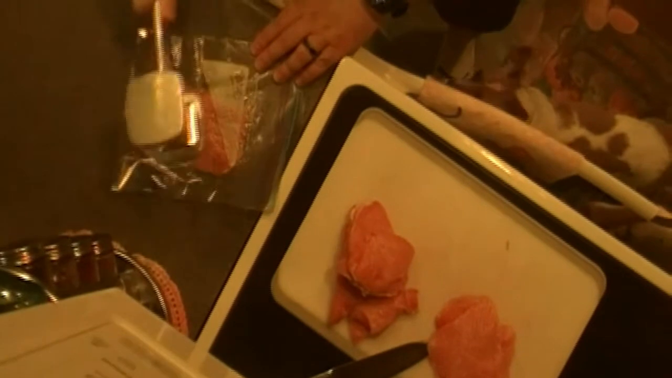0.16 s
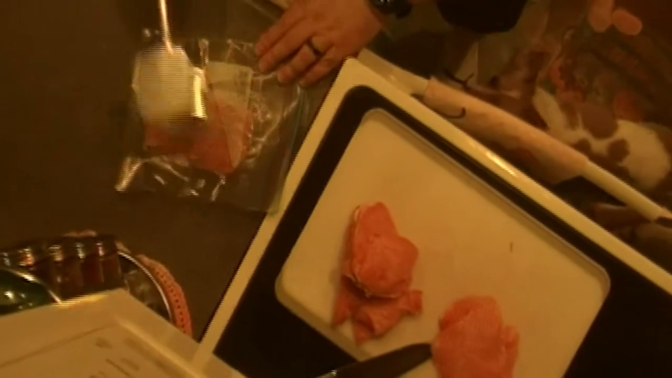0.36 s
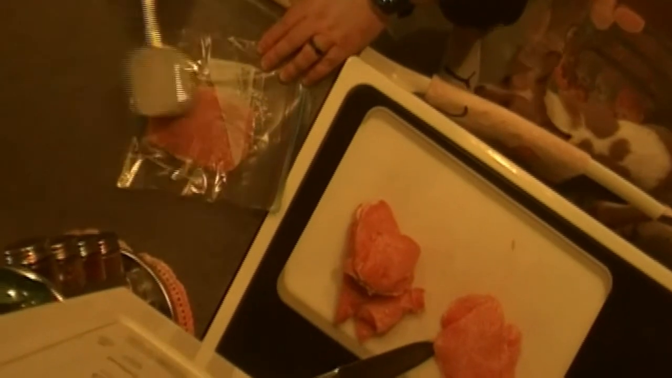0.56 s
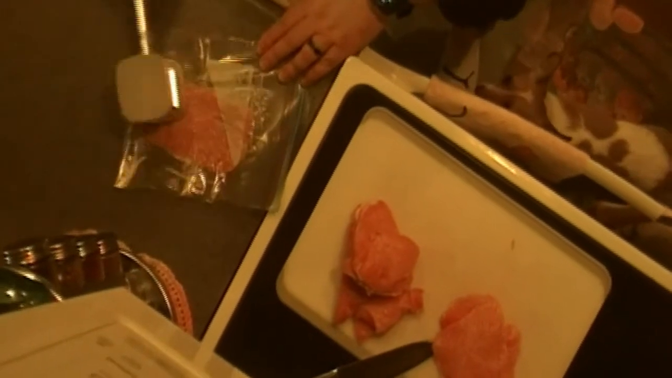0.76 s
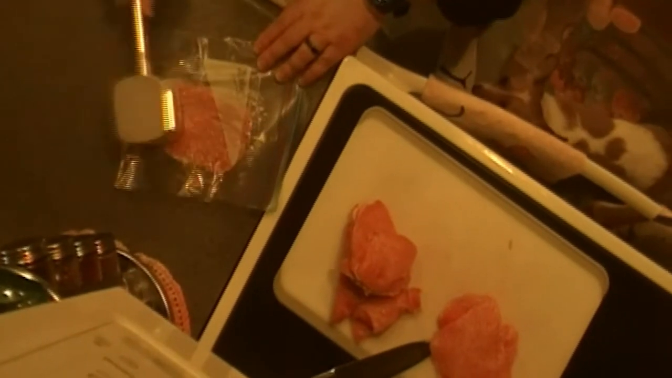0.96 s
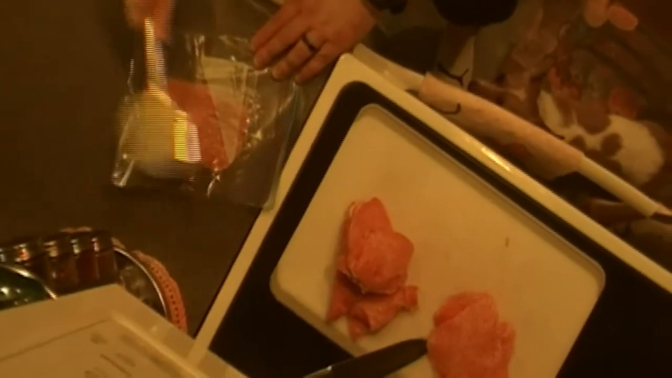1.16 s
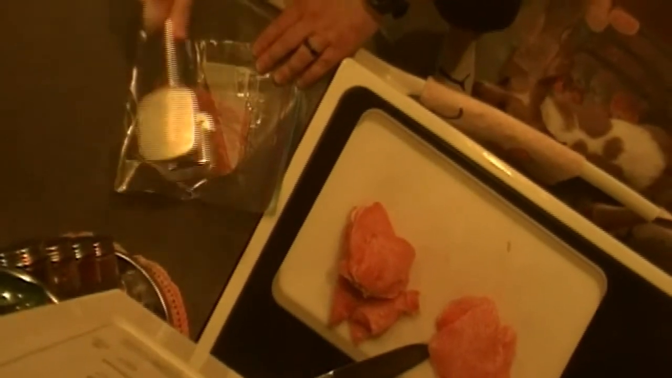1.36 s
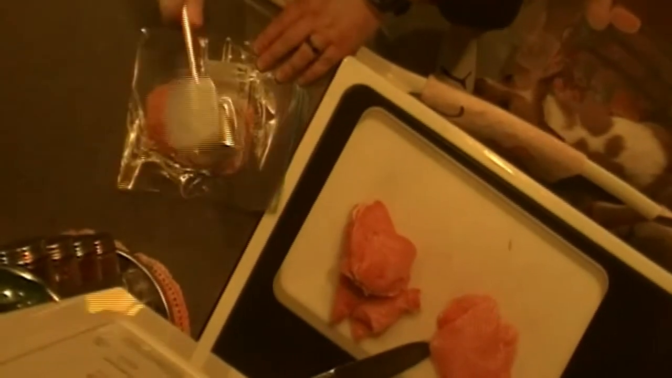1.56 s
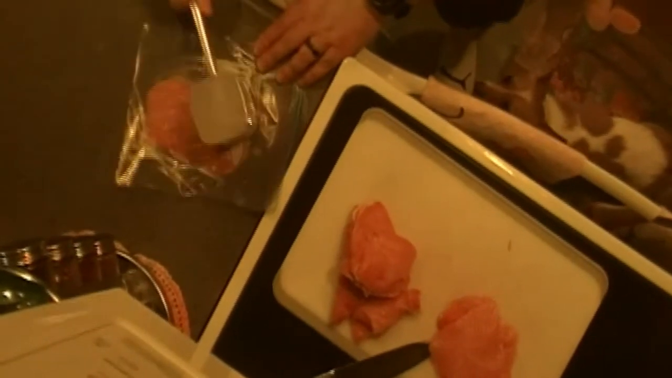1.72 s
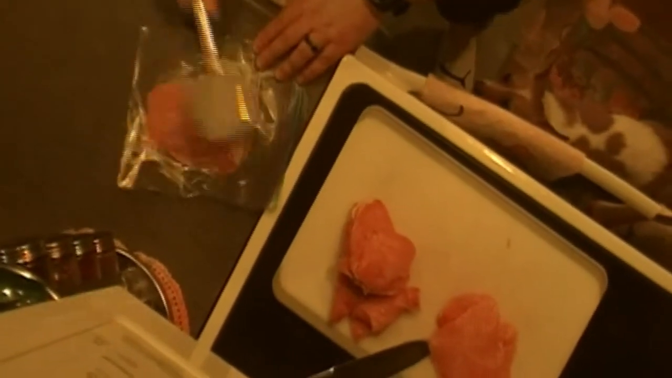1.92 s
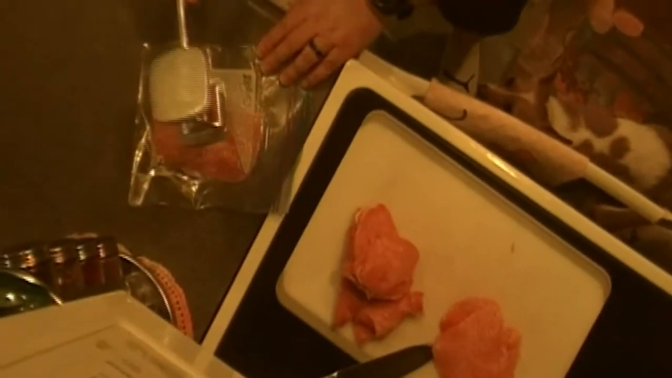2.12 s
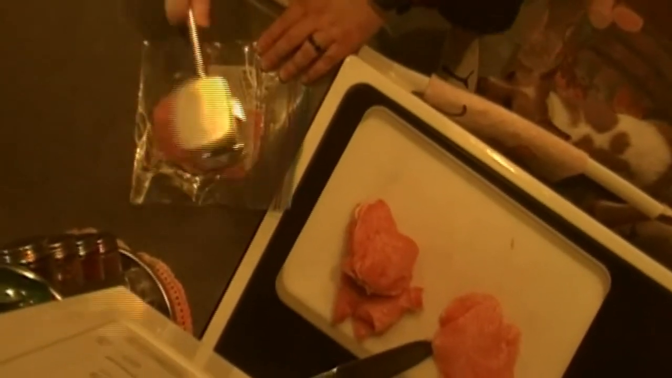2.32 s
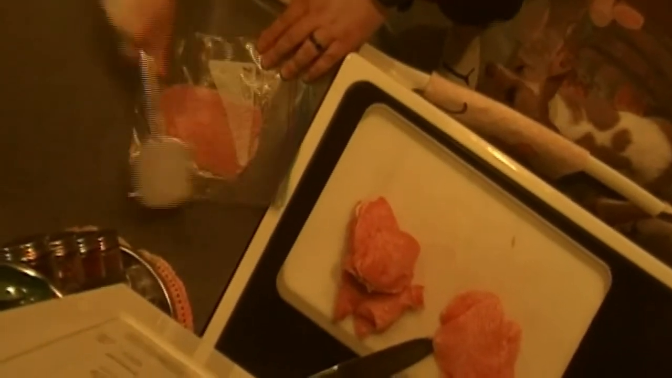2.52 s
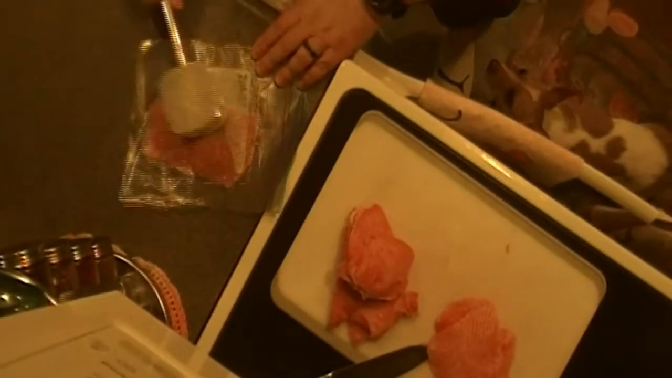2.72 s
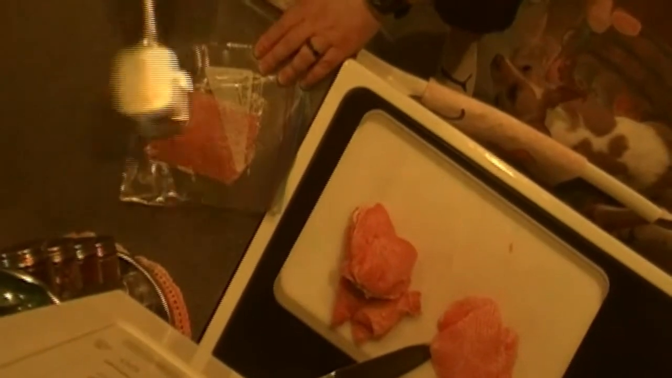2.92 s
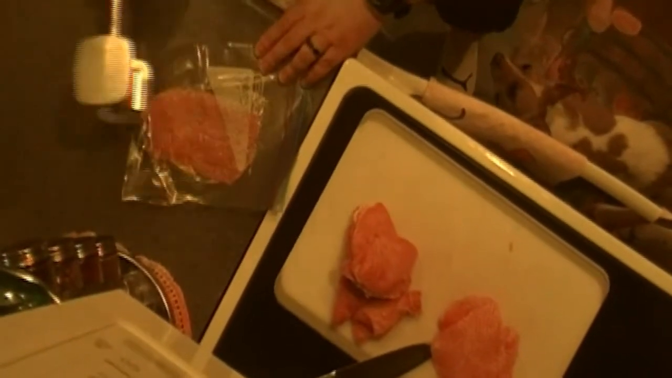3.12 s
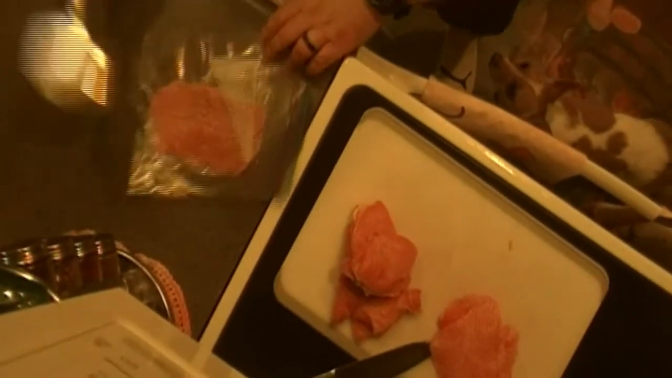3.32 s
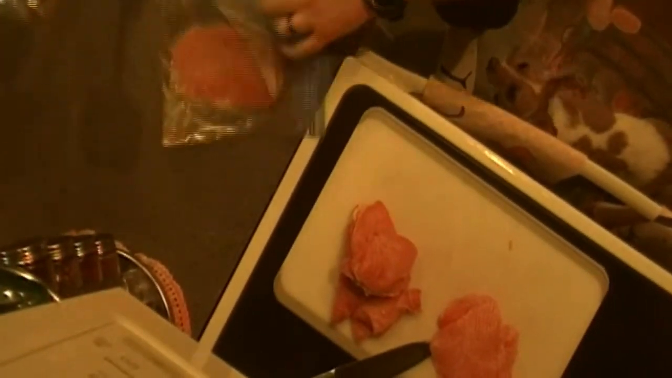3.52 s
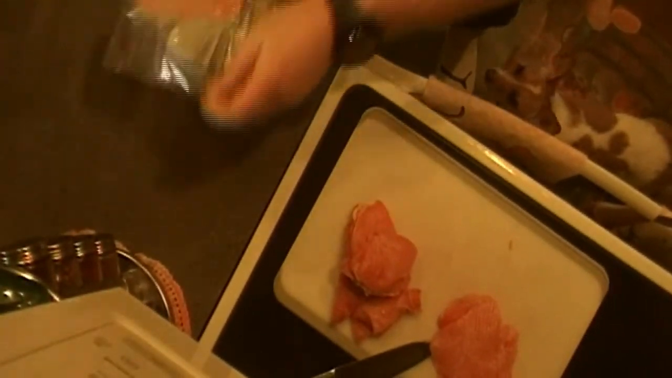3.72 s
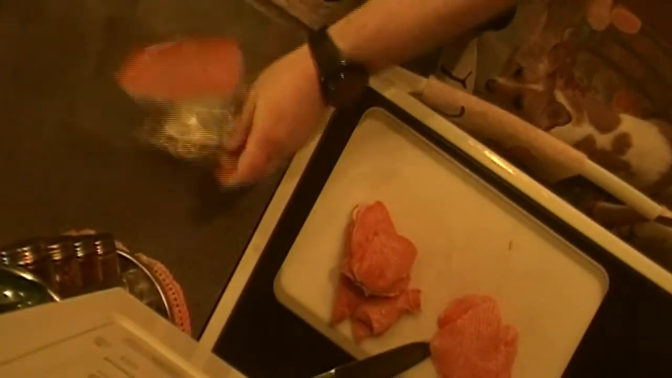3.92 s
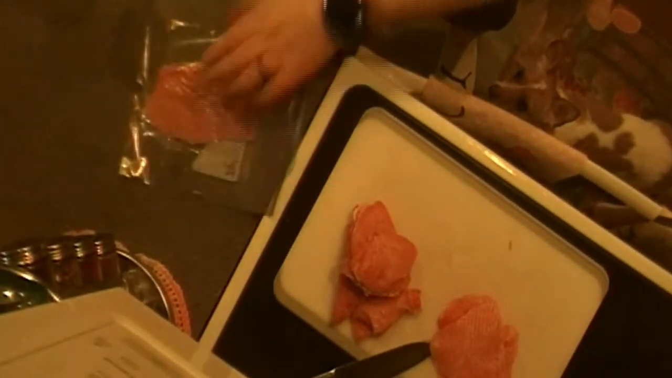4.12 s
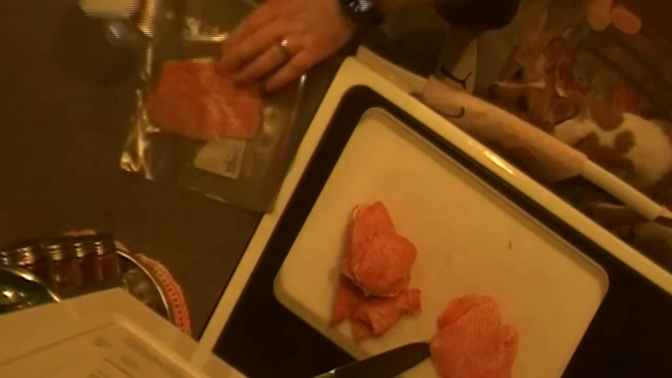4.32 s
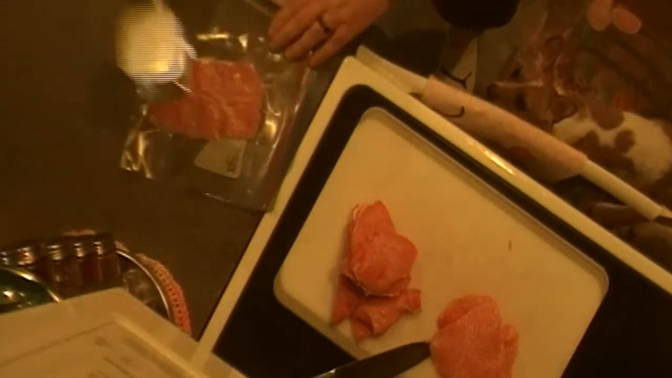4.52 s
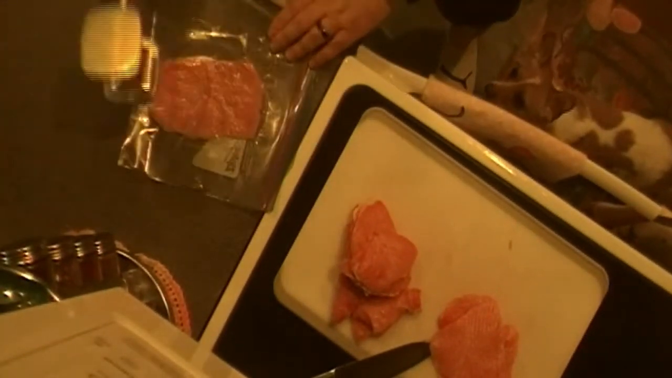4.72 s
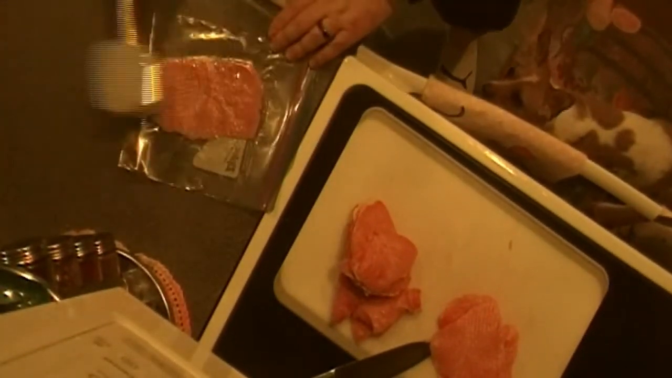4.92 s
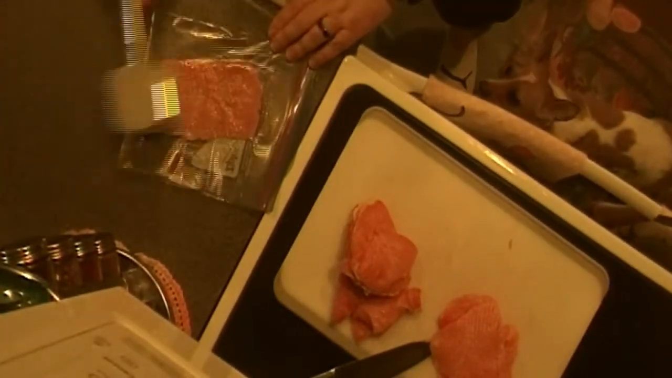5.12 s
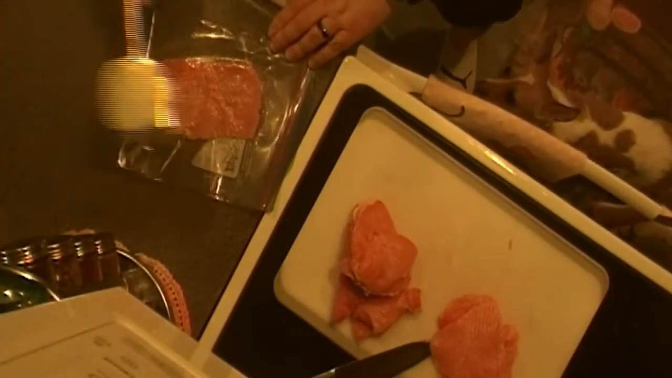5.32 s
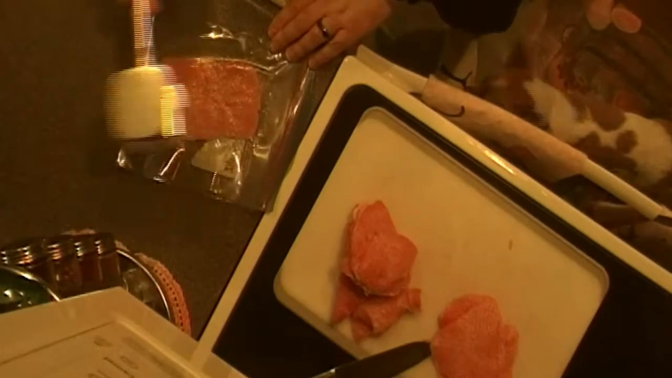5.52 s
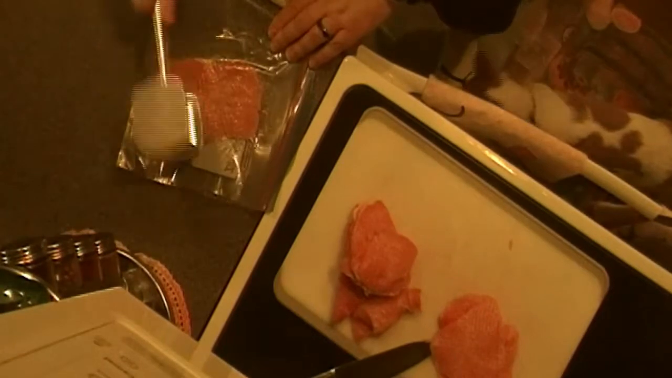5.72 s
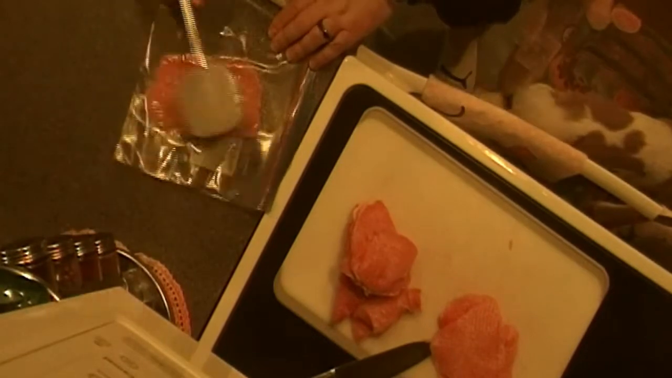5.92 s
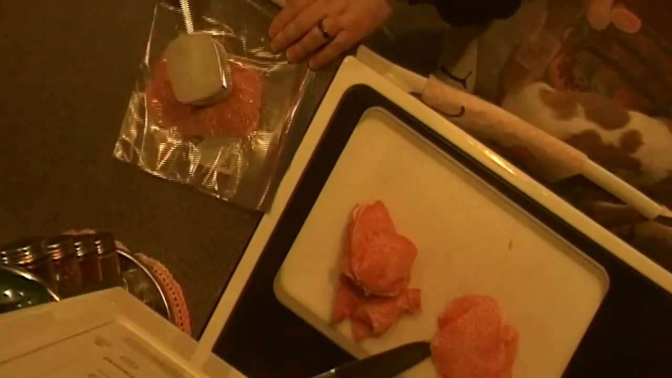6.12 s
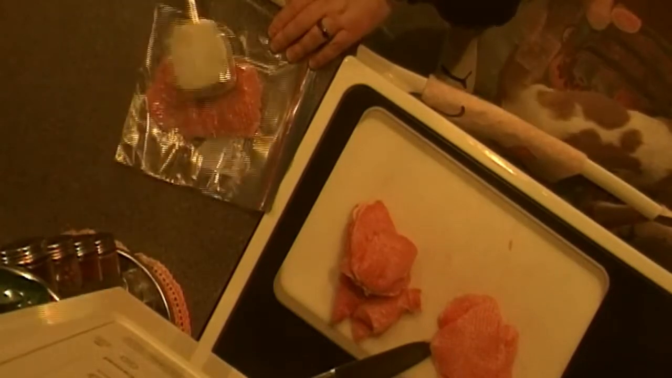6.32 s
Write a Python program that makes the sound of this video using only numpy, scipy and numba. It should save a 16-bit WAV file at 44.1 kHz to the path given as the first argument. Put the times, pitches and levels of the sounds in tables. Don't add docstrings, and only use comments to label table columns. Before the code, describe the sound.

A metal mallet pounds meat in a thin plastic bag on a kitchen counter. From about 0.1 to 3.3 seconds, fourteen heavy blows fall roughly every quarter second, varying between dull meaty thuds and brighter, harder cracks. Each begins with a short slap on the film, then a low thump that rings the counter and cabinets, while glass and steel nearby hop and jingle. From 3.5 to 4.6 the pounding stops: the bag crackles and snaps as it is gathered and turned, loudest near 4.1, knocks the counter at 4.3, then is smoothed and patted. Blows resume at 4.7 and continue about every quarter second to 6.2, with a strong rattle near 5.0. The room gives short echoes over faint low noise. The close camera microphone squashes the peaks, ducks at each hit and swells back, with dulled extreme treble.

```python
import sys
import numpy as np
from scipy import signal
from scipy.fft import rfft, irfft
from scipy.io import wavfile
from numba import njit

SR = 44100
rng = np.random.default_rng(int(sys.argv[2]) if len(sys.argv) > 2 else 0)


def to_linear_factor(level_db):
    exponent = np.asarray(level_db, float) / 20
    return 10 ** exponent


def output_pcm(signal):
    pcm = np.clip(np.atleast_2d(signal).T, -1, 1) * 32767
    wavfile.write(sys.argv[1], SR, np.round(pcm).astype(np.int16))


N = 280476
LEAD = SR // 4
BANDS_HZ = 24 * 2 ** np.arange(0, 9.1, 1 / 3)
HOP_S = 0.027

# start in seconds, slap level in dB, length in ms, centre in Hz,
# depth in dB (a spot far from a support thumps lower).
SLAPS = [(0.114, 2, 4, 3080, 0), (0.3498, 6, 3.3, 3760, 1.5), (0.6095, 4, 3.3, 3060, -1),
         (0.8411, -3, 4.6, 2780, -2), (1.0846, 0.5, 5, 3200, -2.5), (1.3128, -7, 7.4, 2640, -4),
         (1.5561, 5.5, 3.5, 3900, 5), (1.7858, -5, 5.5, 3400, 6), (2.0495, 5, 2.3, 2620, 1.5),
         (2.3185, 5, 4, 2800, 0.5), (2.583, 3, 3.8, 2230, 1), (2.8456, -6, 3.8, 3200, 0.5),
         (3.1, 1.5, 4.5, 2040, -1.5), (3.3333, -6, 1.2, 1370, -1.5), (4.71, 1.5, 2.94, 3180, -3),
         (4.961, 7.5, 3.2, 1950, -3), (5.231, -2, 4.04, 1850, -1), (5.5002, -5, 3.5, 2700, -2.5),
         (5.7388, -2.5, 4, 1830, 2), (5.9769, 2.5, 3.7, 3520, 3), (6.2111, 2.5, 2.66, 2070, 0)]
# pitch in Hz, level in dB per Hz.
FILM_COLOUR = [(88, -30), (150, -4), (333, -9), (535, -13), (1650, -6.5), (1840, -6.5), (4990, -10),
               (10300, -19.5), (11500, -24), (15000, -55), (22000, -120)]
# start in seconds, hold in seconds, rustle in dB,
# dull flop of the load in dB, knock on the counter in dB.
HAND_MOVES = [
    (3.492, 0.25, -34.5, -45, -34),
    (3.777, 0.049, -32.5, -37, -48),
    (3.872, .004, -29, -32, -43),
    (3.925, 0.12, -47, -44, -53),
    (4.045, 0.019, -22.5, -24, -39),
    (4.089, 0.047, -18, -29.5, -41),
    (4.292, 0.032, -21, -38, -28.5),
    (4.382, .07, -35.5, -48, -44),
    (4.604, 0.016, -25.5, -44, -29.5),
]


def along(table, hz):
    f, value = np.transpose(table)
    return np.interp(np.log(np.maximum(hz, 1)), np.log(np.maximum(f, 1)), value)


def spikes(s, size):
    out = np.zeros(N + LEAD, np.result_type(size, float))
    np.add.at(out, (np.asarray(s) * SR).astype(int) + LEAD, size)
    return out


def fade(x, t60, hz=0):
    turn = 2j * np.pi * hz - np.log(1000) / max(t60, 1e-3)
    return signal.lfilter([1], [1, -np.exp(turn / SR)], x)


def band(x, hz, width=1 / 3):
    edges = np.clip(hz * 2 ** (np.array([-0.5, 0.5]) * width), 5, SR / 2.2)
    return signal.sosfilt(signal.butter(2, edges, "band", fs=SR, output="sos"), x)


def unit(x):
    return x / np.max(np.abs(x))


def burst(out_s, size_db, rise_s, ring_s, hz, width, tick=0):
    t = np.arange(int(0.06 * SR)) / SR
    rise = np.minimum(t / rise_s, 1) ** 2
    shape = rise * np.exp(-np.log(1000) * np.maximum(t - rise_s, 0) / ring_s)
    noise = rng.standard_normal((3, len(t)))
    noise[0, int(rise_s * SR)] += tick
    crack = unit(band(shape * (noise[0] + 0.15 * noise[1:]), hz, width))
    return int(out_s * SR) + LEAD, to_linear_factor(size_db) * crack


def add(out, start, piece):
    space = out[:, start:start + piece.shape[1]]
    space += piece[:, :space.shape[1]]


def slaps():
    # centre in Hz, width in octaves.
    slap_width = [(1500, 2.62), (4000, 1.01)]
    out = np.zeros((2, N + LEAD))
    for when, db, ms, hz, _ in SLAPS:
        ms = np.clip(ms, 0.5, 9)
        width = max(along(slap_width, hz), 0.5)
        add(out, *burst(when, db + 25.0, ms / 2400, ms / 400, hz, width))
    return out


def by_pitch(hz, boom_db, thump_db, clap_db, bright_db, depth_db):
    boom = along([(110, 0.65), (170, 0.026)], hz) * (boom_db + 5.5)
    thump = along([(110, 0.2), (170, 0.91), (420, 1), (600, 0)], hz) * thump_db
    depth_share = [(110, -0.26), (170, 0.75), (210, 1), (310, -1.06), (420, 0.39), (600, 0.15)]
    depth = along(depth_share, hz) * depth_db
    clap = along([(420, 0.19), (600, 0.95), (1200, 0.83), (3000, 0.18)], hz) * clap_db
    bright = along([(1000, 0.4), (1600, 0.35), (2500, 0.55), (5000, 0.031)], hz) * bright_db
    return boom + thump + depth + clap + bright


def counter(s, *strength_db):
    # pitch in Hz, level in dB, t60 in seconds.
    cabinet_modes = [(68.95, -11.5, 0.5), (86.1, -9.5, 0.5), (134, -29, 0.12), (195.1, -5.5, 0.24),
                     (258.8, -14, 0.38), (314.4, -13, 0.28), (373.5, -3.5, 0.23), (468, -12.5, 0.2),
                     (637.4, -21.5, 0.21), (675, -17.5, 0.13), (747, -21.5, 0.18), (852, -10.5, 0.054),
                     (1056, -24.5, 0.14)]
    # pitch in Hz, level in dB, t60 in seconds, lateness in ms.
    top_modes = [(140.4, 12.5, 0.031, 0.57), (339.5, 8.5, 0.052, 1.57), (562, -4.5, 0.036, 1.53),
                 (698, 1.5, 0.033, 1.22), (1047, 2.5, 0.021, 1.24)]
    modes = [(*mode, 1.3) for mode in cabinet_modes] + list(top_modes)
    out = 0
    spot = rng.standard_normal((len(s), len(modes)))
    for (hz, db, t60, late_ms), luck in zip(modes, spot.T):
        strength = to_linear_factor(db + by_pitch(hz, *strength_db) + 2.1 * luck)
        out = out - fade(spikes(s + late_ms / 1000, strength), t60, hz).imag
    push = np.hanning(int(0.0004 * SR) + 2)
    return to_linear_factor(5.0) * np.convolve(out, push / push.sum())[:N + LEAD]


def jingle(s, jingle_db):
    glass_hz = [1386, 2340, 2400, 2450, 2490, 3137, 3630, 3675, 4050, 4104, 4227, 4485, 4521, 5060]
    # level in dB, t60 in seconds.
    glass_rings = [(2, 0.23), (-16.5, 0.5), (-7.5, 0.6), (-5.5, 0.34), (-12, 0.6), (-1.5, 0.15),
                   (-5.5, 0.31), (-7, 0.61), (2, 0.13), (-1.5, 0.08), (-7, 0.17), (-6.5, 0.41),
                   (-0.5, 0.13), (3, 0.18)]
    steel_hz = [5350, 5960, 6050, 6977, 7690, 7790, 8520, 8610, 9316, 9570, 9960, 10400, 10520, 11030]
    # level in dB, t60 in seconds.
    steel_rings = [(-20, 0.2), (-10.5, 0.17), (-2, 0.4), (-5.5, 0.28), (-6, 0.38), (-8.5, 0.56), (-7, 0.24),
                   (-2.5, 0.34), (-2.5, 0.35), (-6, 0.82), (-3, 0.35), (-6, 0.2), (-4.5, 0.28), (-13, 0.35)]
    shake = fade(fade(spikes(s + HOP_S, to_linear_factor(jingle_db)), 0.25), 0.033).real / (0.0054 * SR)
    shake += 0.3 * fade(spikes(s, to_linear_factor(jingle_db)), 0.036).real
    landings = np.flatnonzero(rng.random(N + LEAD) < 1500 / SR)
    weight = shake[landings] * to_linear_factor(np.minimum(1.6 * rng.exponential(size=len(landings)), 7))
    blow = np.clip(np.searchsorted(s * SR + LEAD, landings) - 1, 0, None)
    out = 0
    for hz, (db, t60) in zip([*glass_hz, *steel_hz], [*glass_rings, *steel_rings]):
        apart = along([(1500, 0.54), (4000, 0.91), (8000, 1.27)], hz)
        luck = rng.standard_normal((3, len(landings)))
        favoured = to_linear_factor(2.5 * rng.standard_normal(len(s)))[blow]
        knocks = np.zeros((2, N + LEAD))
        knocks[:, landings] = favoured * weight * (luck[0] + apart * luck[1:]) / np.hypot(1, apart)
        ring_s = min(t60, 0.6) * along([(5000, 0.31), (9000, 0.18)], hz)
        out = out + to_linear_factor(db) * fade(knocks, ring_s, hz).imag
    return to_linear_factor(-29) * out


def gesture(db, t60):
    t = (np.arange(N + LEAD) - LEAD) / SR
    start, hold = np.transpose(HAND_MOVES)[:2, :, None]
    rise = np.clip((t - start) / 0.0087, 0, 1)
    shape = rise * to_linear_factor(-60 * np.clip(t - start - hold, 0, 1) / t60)
    return to_linear_factor(db) @ shape


def creases(per_s):
    happens = rng.random(N + LEAD) < per_s / SR
    size = happens * to_linear_factor(np.minimum(3.7 * rng.exponential(size=N + LEAD), 13))
    return size * (rng.standard_normal(N + LEAD) + 0.5 * rng.standard_normal((2, N + LEAD)))


def bag():
    # start in seconds, peak in dB, centre in Hz, width in octaves.
    film_snaps = [(3.576, -19, 2590, 1.1), (3.616, -11.5, 2020, 1.8), (3.635, -27, 2230, 1.8),
                  (3.689, -11, 4520, 1.6), (3.723, -31, 923, 1.5), (3.789, -12.5, 1400, 2.7),
                  (3.82, -14, 2600, 2.5), (3.8817, -6, 5430, 0.98), (3.8828, -13.5, 1790, 1.8),
                  (3.931, -17.5, 2000, 2.5), (3.946, -33, 1440, 2.2), (3.995, -13.5, 2060, 2.1),
                  (4.028, -10, 1010, 3), (4.051, -13, 4430, 1.7), (4.057, -10, 1270, 3),
                  (4.069, -20, 1310, 2.1), (4.0904, 0, 1890, 2.2), (4.105, -10, 4800, 0.73),
                  (4.119, -5.5, 1510, 0.59), (4.13, -6, 1890, 0.89), (4.142, -8, 2080, .6),
                  (4.298, -10, 1610, 1.3), (4.307, 0, 2310, 1.4), (4.324, -5, 4230, 1.1),
                  (4.418, -11.5, 3270, 0.65), (4.429, -13, 1740, 1.5), (4.455, -18, 1300, 1.1),
                  (4.481, -22.5, 3300, 0.93), (4.611, -5, 3270, 1.5)]
    # pitch in Hz, level in dB, t60 in seconds.
    flop_rings = [(330, -10, 0.028), (382, -5.5, 0.046), (654, 0, 0.032), (925, -5.5, 0.035)]
    rustle_db, flop_db, knock_db = np.transpose(HAND_MOVES)[2:]
    effort = gesture(rustle_db, 0.071)
    flop = gesture(flop_db, 0.078)
    knock = gesture(knock_db, 0.31)
    clicks = creases(600)
    crackle = 0
    for hz in BANDS_HZ[16:]:
        shifted = np.roll(clicks, rng.integers(N), axis=1)
        crackle = crackle + to_linear_factor(along(FILM_COLOUR, hz)) * band(shifted, hz, width=0.57)
    pats = flop * band(creases(1500), 500, width=3.4)
    dull = to_linear_factor(-7.5) * sum(to_linear_factor(db) * fade(pats, t60, hz).imag for hz, db, t60 in flop_rings)
    deep = band(rng.standard_normal(N + LEAD), 52.5, width=1.6)
    out = effort * crackle / crackle.std() + dull
    for when, peak_db, hz, octaves in film_snaps:
        ring_s = max(0.024 + 0.0011 * peak_db, 0.008)
        add(out, *burst(when, peak_db, 0.00016, ring_s, hz, max(octaves, 0.4), tick=6.4))
    return out, knock * deep / deep.std()


def pair(hz):
    # pitch in Hz, likeness of left and right from 0 to 1.
    likeness = [(30, 0.82), (250, 0.99), (1000, 0.84), (2500, 0.59), (5000, 0.1), (10000, 0.4)]
    like = np.clip(along(likeness, hz), 0, 1)
    mid, side = band(rng.standard_normal((2, N + LEAD)), hz)
    return (np.sqrt(1 + like) * mid + np.sqrt(1 - like) * side * np.array([[1], [-1]])) / np.sqrt(2)


def room(s, strength_db, jingle_db, rustle):
    # pitch in Hz, level in dB per Hz.
    tail_colour = [(13, -39), (26, -11), (40, -12.5), (75, -11.5), (127, -10), (372, -12.5), (1380, -26),
                   (1940, -29.5), (2450, -26), (2950, -30.5), (9570, -36), (11500, -85), (15000, -73),
                   (22000, -120)]
    # pitch in Hz, t60 in seconds.
    tail_t60 = [(30, 0.67), (100, 0.43), (300, 0.41), (1000, 0.3), (4000, 0.42), (11000, 0.41)]
    # pitch in Hz, level in dB per Hz.
    bare_top = [(260, -2), (450, -8.5), (731, 3.5), (800, 1.5), (893, 2), (2420, -24.5), (3300, -49),
                (4000, -24), (5200, -55), (8800, -120)]
    # pitch in Hz, level in dB per Hz.
    kitchen_colour = [(13, -29), (22, 12), (50, 4.5), (118, -15), (537, -9.5), (1240, -17.5), (3730, -28),
                      (9570, -51), (11500, -53), (15000, -83), (22000, -120)]
    out, floor = 0, 0
    boom_db, thump_db, clap_db, bright_db, depth_db = strength_db
    for hz in BANDS_HZ:
        blow_db = by_pitch(hz, boom_db, thump_db, 0.27 * clap_db, bright_db, depth_db)
        blow_db = blow_db + along([(2000, 0), (4000, 0.57)], hz) * jingle_db
        late_s = along([(1500, 0.028), (3000, 0)], hz) * HOP_S
        strength = to_linear_factor(2 * (blow_db + along(tail_colour, hz) + 23.5))
        hits = spikes(s + late_s, strength) + 0.25 * spikes(s, strength)
        power = fade(hits, along(tail_t60, hz) / 2).real
        hollow_db = clap_db + along([(1000, 0.16), (1600, 1)], hz) * bright_db
        hollow_db = hollow_db + along(bare_top, hz) - 4.5
        power += fade(spikes(s, to_linear_factor(2 * hollow_db)), 0.46 / 2).real
        power += to_linear_factor(2 * (along(FILM_COLOUR, hz) - 24.5)) * fade(rustle ** 2, 0.42 / 2).real
        build_s = 0.0023 + 9.0 / hz
        power = fade(power, build_s).real / (SR * build_s / 7)
        out = out + np.sqrt(power) * pair(hz)
        floor = floor + to_linear_factor(along(kitchen_colour, hz)) * pair(hz)
    return out + to_linear_factor(-27.5 - 10.5) * floor / floor.std()


def scene():
    # start in seconds, thump in dB, board clap in dB,
    # brightness of the clap in dB, jingle in dB.
    blows = [(0.114, 2.5, 1.5, 2, 1), (0.349, 0, 2.5, 8.5, 7), (0.609, 2, 4.5, -1.5, 5),
             (0.842, 1, 0, 4.5, 5.5), (1.086, 2.5, 8.5, 7.5, 8), (1.3161, -5, 18.5, 6.5, -6),
             (1.556, -3, -4.5, 7, -4), (1.7878, 2.5, 9, 2, -0.5), (2.049, 1, -3.5, 5.5, 3),
             (2.319, 2.5, 4.5, 6, 3.5), (2.583, -4.5, 15.5, 7, -8.5), (2.845, 0, -13, -2, -2),
             (3.101, 1, 4.5, 5, 6.5), (3.333, 0.5, 2, 3.5, 4), (4.709, -1.5, -4.5, 0.5, 5),
             (4.962, 1, 8, 8, 10.5), (5.231, 2.5, 3, 2, 1.5), (5.5012, 3.5, 16.5, -0.5, 0),
             (5.739, -1, -23, 3, -6.5), (5.977, 1, -1.5, 6, -1.5), (6.211, -1.5, -13.5, 6.5, 1.5)]
    earlier_blow = (4.8, 5.9, 3.7, 4.5)
    earlier_s = -0.125
    s, thump_db, clap_db, bright_db, jingle_db = np.transpose([(earlier_s, *earlier_blow), *blows])
    slap_s, depth_db = np.transpose(SLAPS)[[0, 4]]
    s = np.maximum(s, [earlier_s, *slap_s])
    boom_db = -5 - 0.62 * np.maximum(clap_db, 0) - 0.56 * bright_db
    strength_db = boom_db, thump_db, clap_db, bright_db, np.append(0, depth_db)
    film, knocks = bag()
    near = slaps() + counter(s, *strength_db) + jingle(s, jingle_db) + film + knocks
    return (near + room(s, strength_db, jingle_db, film.mean(axis=0)))[:, LEAD:]


@njit
def follow(x, start, attack, release):
    out, e = np.empty(len(x)), start
    for i in range(len(x)):
        e += (x[i] - e) * (attack if x[i] > e else release)
        out[i] = e
    return out


def roll_off(x):
    return signal.sosfilt(signal.butter(12, 11910, fs=SR, output="sos"), x)


def record(dry):
    # pitch in Hz, left minus right in dB.
    port_lean = [(60, 1.5), (110, 1.0), (190, 0.5), (340, 0.0), (620, 0.5), (1100, 0.5), (1970, 0.5),
                 (3530, -0.5), (6320, -2.5), (11300, -1.5)]
    # pitch in Hz, lead of the left port in radians.
    port_lead = [(0, 0), (3620, 0.02), (4220, 0.55), (6980, 4), (7840, 1.5), (8440, 3), (9220, 7),
                 (10200, 7.5), (11500, 9.5)]
    hz = np.fft.rfftfreq(N, 1 / SR)
    lean = to_linear_factor(along(port_lean, hz) / 2) * np.exp(0.5j * along(port_lead, hz))
    x = irfft(rfft(dry) * np.array([lean, 1 / lean]), N)
    ahead = int(0.0021 * SR)
    heard = np.pad(np.abs(x).max(axis=0)[ahead:], (0, ahead))
    envelope = follow(heard, 0.69, 1 / (0.014 * SR), 1 / (0.035 * SR))
    x = x * np.minimum(to_linear_factor(-7.5) / (envelope + 1e-9), 1) ** 0.84
    x = 0.94 * x / (1 + np.abs(x / 0.94) ** 10) ** (1 / 10)
    x = signal.sosfilt(signal.ellip(8, 0.2, 60, 11100, fs=SR, output="sos"), x)
    return roll_off(np.clip(x, -1, 1))


dry = scene()
out = record(dry)
output_pcm(out)
```